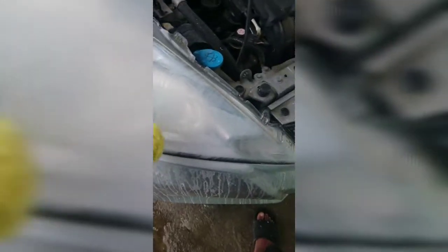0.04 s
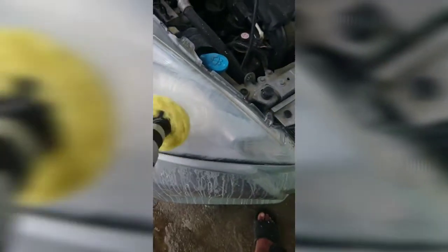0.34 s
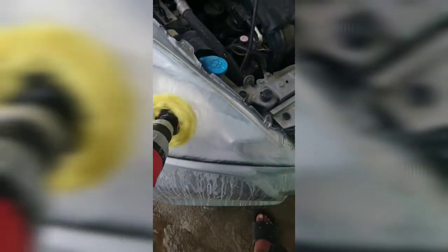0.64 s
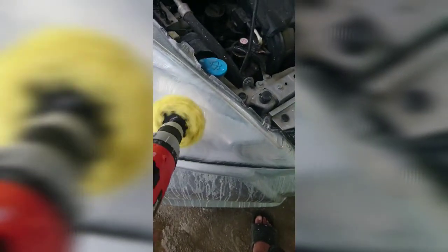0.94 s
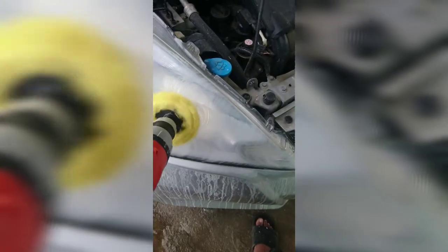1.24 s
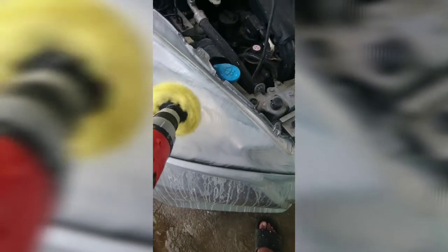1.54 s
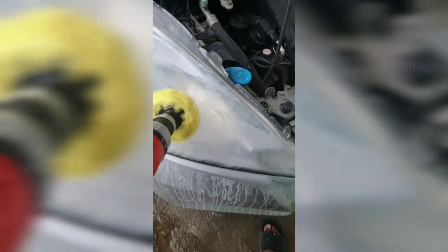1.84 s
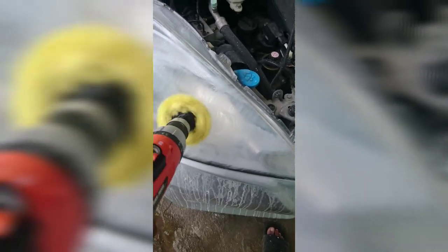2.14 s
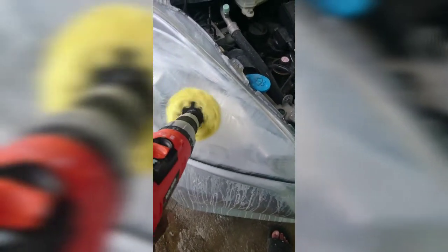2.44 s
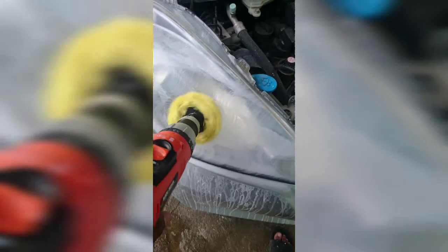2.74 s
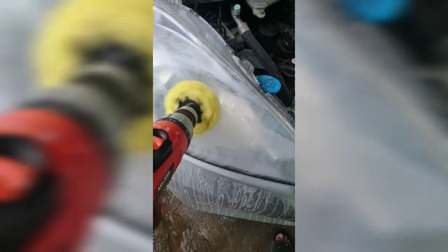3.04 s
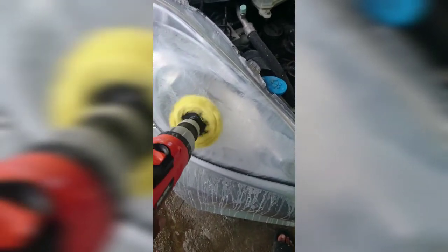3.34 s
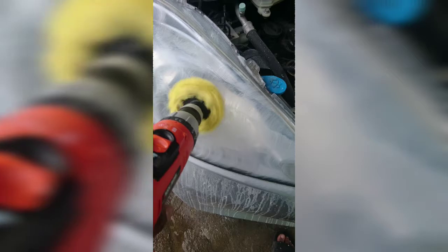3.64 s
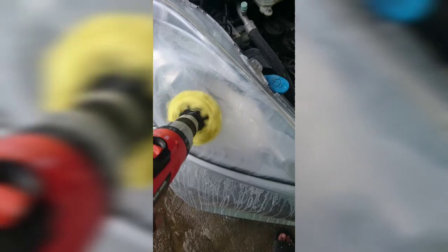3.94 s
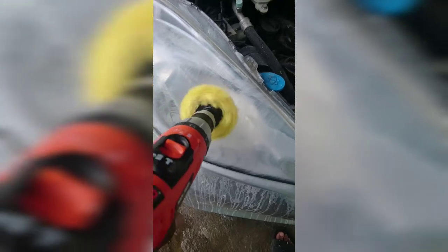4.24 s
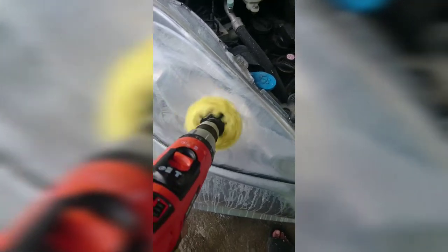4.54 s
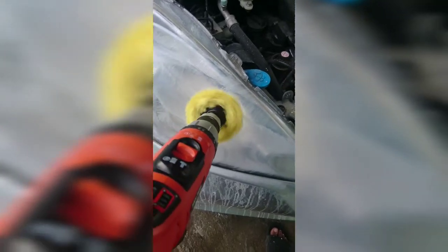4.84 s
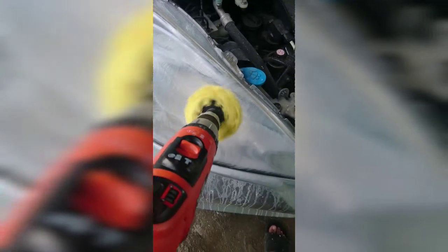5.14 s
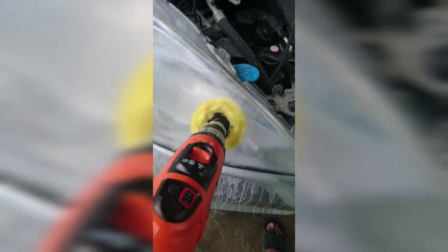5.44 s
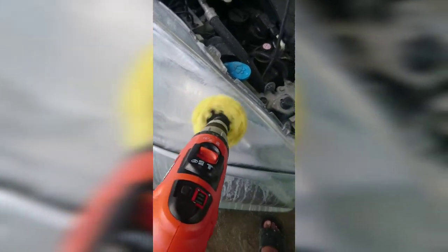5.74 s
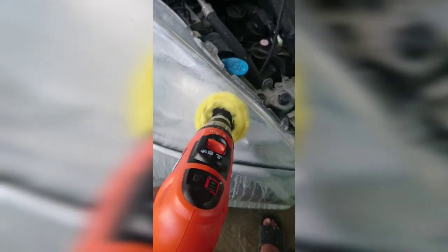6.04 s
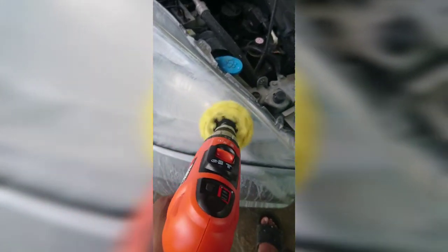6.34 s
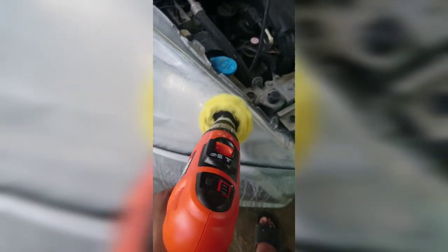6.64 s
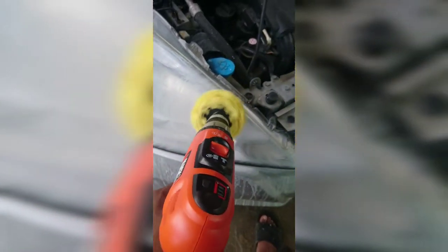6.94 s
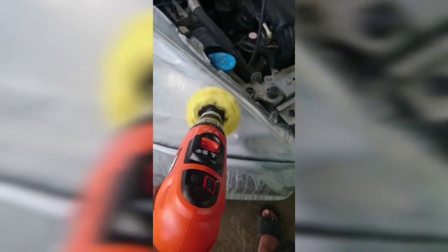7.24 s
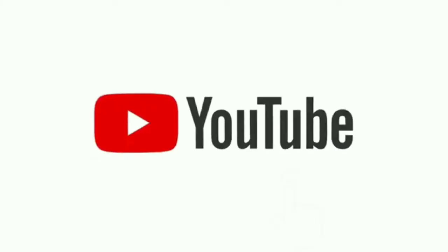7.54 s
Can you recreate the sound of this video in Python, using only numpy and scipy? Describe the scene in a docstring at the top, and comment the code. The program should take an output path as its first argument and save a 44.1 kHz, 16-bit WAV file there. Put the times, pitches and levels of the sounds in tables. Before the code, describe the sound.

Heard close up outdoors, a cordless drill starts with small clicks and a brief rasp, then polishes a plastic car headlamp with a wet foam pad. A piercing, even whine rides on fizzing motor hiss and the pad's continuous rubbing, growing louder and softer as the tool is pressed and steered. Near the end the pitch dips and the drill stops at once with a clack, over a barely audible low rumble.

```python
"""A cordless drill spins a foam pad on a plastic headlamp, close by.
The trigger clicks, the motor runs up, and the gear teeth whine, sagging and swelling as the pad is
pressed and steered. The motor adds many fainter tones, the wet pad rubs, and gears and brushes hiss.
The drill swings round until it points away from the listener; on release the brake stops it at once.
The car body and floor add a short echo, over faint outdoor air and a low rumble."""
import sys
import numpy as np
from scipy import signal
from scipy.fft import rfft, irfft, next_fast_len
from scipy.io import wavfile
from scipy.ndimage import uniform_filter1d, map_coordinates

SR = 44100
rng = np.random.default_rng(int(sys.argv[2]) if len(sys.argv) > 2 else 0)


def inscribe(sig):
    """Save sig as 16-bit PCM at rate SR to the path in sys.argv[1].

    A 1-D sig is mono; a 2-D sig holds one channel per row.
    Samples are clipped to [-1, 1] before scaling.
    """
    pcm = np.round(np.clip(np.atleast_2d(sig).T, -1, 1) * 32767)
    wavfile.write(sys.argv[1], SR, pcm.astype(np.int16))


N = 335160

START_S, EASE_S, BRAKE_S = 0.1, 7.31, 7.451  # trigger pulled, trigger let up, brake on
COAST_HZ_PER_S, BRAKE_HZ_PER_S = 235, 4830  # how fast the motor loses speed
TEETH, GEAR_RATIO, PLANETS = 15, 31, 3  # teeth on the motor's gear, motor turns per pad turn, gears
SIZZLE_MULTIPLES = (39, 40)  # two motor tones near 12 kHz
TOP_HZ = 15750

# Levels in the tables are relative. A "multiple" times the motor's turns per second gives a pitch.
# "Side", "slant" and "rear" are levels heard from there; t60 is the time taken to fade by 60 dB.
# Load on the gears, given as the strength of their whine: t/s, level/dB
GEAR_LOAD = [(0.5, -37), (0.59, -41), (1.43, -39.5), (1.73, -29.5), (2.03, -32.5), (2.47, -25.5),
             (3.3, -22.5), (3.4, -27), (3.7, -22), (4.42, -23), (4.7, -32.5), (5.18, -28), (5.5, -38),
             (5.61, -34), (5.67, -37), (5.86, -35), (5.97, -38.5), (6.24, -23.5), (6.75, -22.5), (7.3, -25)]
# The teeth briefly bite harder (+) or run slack (-): t/s, half length/s, level/dB
TOOTH_BITES = [(.175, .008, -14), (0.284, 0.027, 7.5), (.333, .008, -10), (.38, 0.031, 4.5), (.63, .03, -7),
               (.8, .1, -3), (1.22, .03, -12), (1.72, .1, 0.5), (2.12, 0.031, 3), (4.85, 0.038, 5.5),
               (5.502, 0.032, -4), (5.69, 0.026, -10), (5.963, 0.022, -6), (7.368, .022, -4.5),
               (7.437, .02, -4)]
# Motor turns per second at full trigger: t/s, f/Hz
CRUISE_SPEED = [(0.55, 305.0), (1.82, 303.1), (2.22, 303.5), (3.19, 301.9), (3.29, 299.4), (3.73, 302.3),
                (3.83, 297.4), (4.18, 300.3), (5.27, 296.0), (5.48, 297.0), (6.27, 294.8), (6.66, 296.0),
                (6.92, 294.1), (7.28, 294.1)]
# Which way the drill points: t/s, turn (0 heard from the side, 1 from behind)
DRILL_TURN = [(0, 0), (3.8, 0.034), (4.6, 0.27), (5.85, 0.71), (6.2, 0.98), (7.6, 0.89)]
# Plain motor tones: multiple, side/dB, slant/dB, rear/dB
MOTOR_TONES = [(4, -56, -51, -53), (5, -60, -63, -55), (6, -66, -50, -48), (10, -70, -56, -63),
               (12, -58.5, -63, -67), (17, -68, -59, -63), (19, -62, -46, -58), (20, -58, -56, -50),
               (21, -49, -54, -51), (22, -57, -61, -52), (23, -68, -55, -48), (24, -54, -61, -55),
               (30, -53.5, -50, -56.5), (31, -74, -56, -62), (32, -54.5, -57, -53), (33, -59, -50, -56),
               (34, -56, -51, -58), (35, -63, -55, -66), (36, -63, -68, -64), (37, -54.5, -57, -56),
               (38, -55, -55, -70), (39, -50.5, -47.5, -55), (41, -56, -44.5, -60), (42, -67, -44, -50),
               (43, -55, -51, -59), (44, -66, -62, -60), (45, -56, -59, -58), (46, -65, -66, -60.5),
               (47, -55, -62, -59), (48, -61, -62, -70), (49, -61, -66, -65), (50, -56, -58, -72),
               (51, -54, -59, -56), (52, -47, -55, -64)]
# Stronger motor tones, most following the load: multiple, side/dB, slant/dB, rear/dB, dB per dB of load
LOADED_TONES = [(1, -51, -56.5, -60, 0), (2, -51, -54.5, -55.5, -0.03), (9, -48, -42.5, -47, 0.1),
                (14, -42.5, -35, -39.5, 0.4), (16, -43.5, -36, -49, .5), (18, -48, -39.5, -49, 0.1),
                (40, -47.5, -43, -58, -0.1)]
# The two tones near 12 kHz swell, then dip: t/s, half length/s, level/dB
SIZZLE_SWELLS = [(2.55, .45, 4.5), (3.95, .4, -3.5)]
# Colour of the pad's rubbing and the housing: f/Hz, level/dB
RUB_COLOUR = [(120, -34.5), (225, -25), (272, -16), (340, -19.5), (620, -12), (740, -12.5), (900, -7.5),
              (1050, -7), (1230, -5.5), (1420, -10), (1600, -9), (1830, -5.5), (2050, -10.5), (2350, -17),
              (3500, -27)]
# Hiss of the gears and cooling air: f/Hz, side/dB, rear/dB
GEAR_HISS = [(1800, -30, -32), (2450, -4, -7), (2710, 0.5, 2), (3230, 9.5, 6.5), (3670, 2.5, -4.5),
             (4050, 10.5, 15.5), (4450, 5, 5), (5200, 2, 5.5), (5790, 4, 6), (7000, -2.5, 2),
             (7540, -2.5, -6), (7960, -15, -15), (9000, -42, -40)]
# Fizz of the brushes, the motor's sliding contacts: f/Hz, side/dB, rear/dB
BRUSH_FIZZ = [(7500, -40, -38), (8400, -21, -14), (8970, -5.5, -3), (10200, -4.5, -8), (10900, -9.5, -18),
              (11550, -4, -8), (12100, 1.5, -6), (13100, -4, -3), (14500, -5, -14), (15500, 2, -6),
              (16500, -6, -15)]
# Pitches at which the gearbox rings: f/Hz, width/Hz, level/dB
GEARBOX_RINGS = [(6190, 740, 2.5), (9900, 300, -9), (13200, 1000, -12), (15100, 700, -18)]
# The rasp flares while the speed changes: t/s, half length/s, level/dB
RASP_FLARES = [(.13, .02, -47), (.3, 0.089, -40.5), (7.39, .04, -44.5)]
# Clicks of the trigger and loose gears: t/s, steel ring/dB, crack/dB, housing knock/dB
CLICK_HITS = [(0.061, -54, -50, -73), (0.076, -43, -66, -75), (0.085, -29.5, -54, -57),
              (.109, -50.5, -39, -36), (.124, -41, -25, -44), (0.147, -30, -26, -42),
              (7.452, -42.5, -25, -38), (7.462, -42, -22, -39), (7.474, -48, -40, -34)]
# Ringing of small steel parts: f/Hz, level/dB, t60/s
STEEL_RINGS = [(4230, -22, .025), (4600, 1, 0.025), (4950, -5, 0.052), (6350, -21, 0.022)]
# Ringing of the drill's housing: f/Hz, level/dB, t60/s
HOUSING_RINGS = [(520, -12, .16), (667, -5, 0.14), (1130, -4, .09), (1282, 2, 0.083), (1840, -16, 0.041)]
# Length of the echo from car body and floor: f/Hz, t60/s
ECHO_DECAY = [(200, 0.53), (1200, 0.23), (4200, 0.36), (8000, 0.26), (15000, 0.079)]
# Colour of the outdoor air: f/Hz, level/dB
AIR_COLOUR = [(30, -12), (150, -3.5), (500, -6), (1200, -8), (2500, -15), (5000, -16), (9000, -25),
              (16000, -38)]
# Colour of the low rumble: f/Hz, level/dB
RUMBLE_COLOUR = [(20, -27), (35, -18), (52, 1), (85, 6), (130, -7), (250, -32), (600, -60)]
# Swells of that rumble: t/s, half length/s, level/dB
RUMBLE_SWELLS = [(.58, 0.19, -61), (3.33, .07, -60), (3.93, 0.065, -65), (4.62, 0.1, -67), (6.86, .06, -64),
                 (7.21, .08, -56)]


def gear_whine(angle, pace, speed, flutter_db=0.92, rough=0.036, trim_db=2.1, slack_hz_per_s=1500):
    """The teeth of the motor's gear sing one strong tone; hard braking parts them and they go silent."""
    level_db = curves(GEAR_LOAD)[0] + swells_db(TOOTH_BITES) + trim_db
    touching = uniform_filter1d(1.0 * (np.gradient(speed) * SR > -slack_hz_per_s), size=128)
    whine = tone(TEETH * angle) + rough * wobble(350) * tone(TEETH * angle)
    return touching * pace ** 2.4 * amp(level_db + flutter_db * wobble(18)) * whine


def motor_speed(run_up_s=0.058, run_up_shape=0.85):
    """Turns per second: the motor runs up, coasts as the trigger is let up, and is braked."""
    run_up = 1 - np.exp(-(since(START_S) / run_up_s) ** run_up_shape)
    lost = COAST_HZ_PER_S * since(EASE_S) + BRAKE_HZ_PER_S * since(BRAKE_S)
    return np.maximum(curves(CRUISE_SPEED)[0] * run_up - lost, 0)


def shaft_angle(speed, drag=0.00074, jitter=0.000495):
    """The motor's angle in turns; the off-centre pad drags once in each of its own turns."""
    pad_angle = np.cumsum(speed) / SR / GEAR_RATIO + 0.14 * wobble(3.01)
    return np.cumsum(speed * (1 + drag * tone(pad_angle) + jitter * wobble(40))) / SR


def motor_tones(angle, pace, turn, load_db, wander_db=1.5, flutter_db=1.97, drift_db=0.8, play=0.0043):
    """Tones at multiples of the motor's speed waver as the hand moves; some follow the load."""
    out = np.zeros(N)
    sizzle_db = dict.fromkeys(SIZZLE_MULTIPLES, swells_db(SIZZLE_SWELLS))
    for multiple, *views_db in MOTOR_TONES:
        level_db = level_at_turn(views_db, turn) + sizzle_db.get(multiple, 0) + 0.5
        waver_db = wander_db * wobble(3.07) + flutter_db * wobble(25)
        out += amp(level_db + waver_db) * tone(multiple * angle)
    for multiple, *views_db, follows in LOADED_TONES:
        level_db = level_at_turn(views_db, turn) + sizzle_db.get(multiple, 0) + follows * load_db
        waver_db = drift_db * wobble(3.97)
        shaken = angle + play * wobble(70)  # loose bearings blur the higher tones most
        roughness = 1 + 0.23 * min(multiple / TEETH, 1) * wobble(45)
        out += amp(level_db + waver_db) * roughness * tone(multiple * shaken)
    return out * pace ** 8  # fades steeply at low speed


def rotor_hum(angle, pace, speed, turn, hum_db=-50, growl_db=-27.5, housing_hz=575, width_octaves=0.54):
    """The rotor's three magnetic poles hum, and growl under the heavy current of start and stop."""
    pole_angle, pole_hz = 3 * angle, 3 * speed
    current = np.abs(uniform_filter1d(np.gradient(speed), size=400)) * SR / BRAKE_HZ_PER_S
    # The growl is boosted as its pitch sweeps past the housing's own note.
    boost = np.exp(-(np.log2((pole_hz + 1) / housing_hz) / width_octaves) ** 2)
    growl = amp(growl_db) * current ** 1.27 * boost
    hum = amp(hum_db - 8 * turn) * pace ** 2
    flutter = amp(1.7 * wobble(20))
    return (hum + growl) * flutter * (tone(pole_angle) + amp(-24) * tone(2 * pole_angle))


def pad_rub(angle, turn, rub_db=-37, ring_db=-41.3, ring_hz=1238, ring_width_hz=106, settle_s=0.23):
    """The wet pad settles on the lamp and rubs, throbbing as the planet gears pass; the shell rings."""
    settling_db = -5 * np.exp(-since(START_S) / settle_s)
    level = running(delay_s=0.0023, attack_s=0.01, overrun_s=0.021, t60=0.09)
    level *= amp(0.67 * turn + settling_db)
    throb = tone(PLANETS * angle / GEAR_RATIO + 0.15 * wobble(6))
    flutter_db = 0.62 * wobble(30) + 0.86 * wobble(160)
    rub = amp(rub_db + flutter_db) * (1 + 0.056 * throb) * unit(noise(RUB_COLOUR))
    shaking = rng.standard_normal(N) * amp(0.85 * wobble(35)) * (1 + 0.14 * throb)
    shell = filtered(shaking, lambda hz: 1 / (1 + 1j * (hz - ring_hz) / ring_width_hz) ** 2)
    return level * (rub + amp(ring_db + 2 * turn) * unit(shell))


def gear_and_brush_hiss(angle, pace, turn, load_db, gain_db=-34, pulsing=0.17):
    """Gears, cooling air and brushes hiss, pulsing once per motor turn."""
    level = running(delay_s=0.012, attack_s=0.014, overrun_s=0.02, t60=0.056)
    level *= amp(gain_db + 2.1 * turn - 7 * (1 - pace) + 0.04 * load_db)
    pulse = amp(0.69 * wobble(60)) * (1 + pulsing * tone(angle))
    return level * pulse * (turning_noise(GEAR_HISS, turn) + turning_noise(BRUSH_FIZZ, turn))


def gear_rasp(angle, start_db=-40, fade_db_per_s=3.3, pulsing=0.35, grain_db=2):
    """Chattering teeth make the gearbox ring at a few high pitches, less and less as they run in."""
    def gearbox(f):
        return sum(amp(db) / (1 + ((f - hz) / (width / 2)) ** 2) for hz, width, db in GEARBOX_RINGS)

    level = amp(start_db - fade_db_per_s * since(START_S)) + swells(RASP_FLARES)
    level *= running(delay_s=0.02, attack_s=0.013, overrun_s=0.0055, t60=0.04)
    chatter = rng.standard_normal(N) * (1 + pulsing * tone(angle)) * amp(grain_db * wobble(120))
    return level * unit(filtered(chatter, gearbox))


def gear_grind(angle, pace, turn, load_db, grind_db=-41.3, wobbles_per_s=750):
    """Loaded teeth meet unevenly and spread a band of noise round the pitch of the whine."""
    level_db = grind_db + 0.7 * load_db - 7 * turn + 0.5 * wobble(30)
    phase = 2 * np.pi * TEETH * angle
    band = wobble(wobbles_per_s) * np.sin(phase) + wobble(wobbles_per_s) * np.cos(phase)
    return pace ** 6 * amp(level_db) * unit(band)


def clicks(crack_t60=0.033, attack_s=0.0011, low_hz=450, high_hz=8000):
    """The trigger and the slack in the gears ring small steel parts and knock the housing."""
    out, t = np.zeros(N + SR), np.arange(SR // 5) / SR
    rise = 1 - np.exp(-t / attack_s)

    def ring(notes):
        return rise * sum(amp(db - 60 * t / t60) * tone(hz * t) for hz, db, t60 in notes)

    for s, ring_db, crack_db, knock_db in CLICK_HITS:
        crack = amp(crack_db - 60 * t / crack_t60) * rng.standard_normal(len(t))
        click = crack + amp(ring_db) * ring(STEEL_RINGS) + amp(knock_db) * ring(HOUSING_RINGS)
        out[round(s * SR):][:len(t)] += click
    return filtered(out[:N], lambda hz: hz ** 2 / (hz ** 2 + low_hz ** 2) / (1 + (hz / high_hz) ** 4))


def echo(x):
    """The car body and floor answer with a short tail of sound."""
    hz, t, spectrum = signal.stft(rng.standard_normal(SR // 2), SR, nperseg=256)
    fade = amp(-60 * t / along(ECHO_DECAY, hz)[:, None])
    tail = signal.istft(spectrum * fade, SR, nperseg=256)[1]
    return signal.fftconvolve(x, tail / np.linalg.norm(tail))[:N]


def background(air_db=-62, rumble_db=-71.5, uneven_db=3):
    """Faint outdoor air and an uneven low rumble."""
    rumble_level = amp(rumble_db + uneven_db * wobble(8.3)) + swells(RUMBLE_SWELLS)
    return amp(air_db) * unit(noise(AIR_COLOUR)) + rumble_level * unit(noise(RUMBLE_COLOUR))


def amp(db):
    """Turn decibels into a number to multiply by."""
    return np.exp(np.asarray(db) * (np.log(10) / 20))


def unit(x):
    """Scale a sound to an average strength (rms) of 1."""
    return x / np.sqrt(np.mean(x ** 2) + 1e-20)


def along(points, hz):
    """Read between (f/Hz, value) points, with octaves evenly spaced."""
    f, values = np.transpose(points)
    return np.interp(np.log(hz + 1), np.log(f + 1), values)


def curves(rows):
    """Join a table's points over time: one value per sample for each column after the first."""
    s, *columns = np.transpose(rows)
    return [np.interp(np.arange(N) / SR, s, column) for column in columns]


def wobble(rate):
    """A smooth curve through `rate` random values a second."""
    at = np.linspace(0, N, 8 * int(N * rate / SR + 1))
    values = rng.standard_normal(int(N * rate / SR) + 4)
    smooth = map_coordinates(values, [at * rate / SR], mode="nearest")
    return np.interp(np.arange(N), at, smooth)


def filtered(x, response):
    """Multiply each frequency in x by response(hz)."""
    size = next_fast_len(N + SR // 2)
    return irfft(rfft(x, size) * response(np.fft.rfftfreq(size, 1 / SR)), size)[:N]


def noise(colour):
    """Noise shaped by (f/Hz, level/dB) points."""
    return filtered(rng.standard_normal(N), lambda hz: amp(along(colour, hz)))


def turning_noise(colours, turn):
    """Noise that blends from its side colour to its rear colour as the drill turns."""
    hz, side, rear = np.transpose(colours)
    return np.sqrt(1 - turn) * noise(np.c_[hz, side]) + np.sqrt(turn) * noise(np.c_[hz, rear])


def level_at_turn(views_db, turn):
    """Blend the side, slant and rear levels as the drill turns."""
    return np.interp(turn, np.linspace(0, 1, len(views_db)), views_db)


def tone(angle):
    """A sine wave of rms 1 with a random start; the angle is in turns."""
    return np.sqrt(2) * np.sin(2 * np.pi * (angle + rng.random()))


def since(s):
    """Seconds gone by since a moment, 0 before it."""
    return np.maximum(np.arange(N) / SR - s, 0)


def bell(s, half_s):
    """A smooth rise to 1 and fall around a moment."""
    return np.exp(-np.minimum(((np.arange(N) / SR - s) / half_s) ** 2, 20))


def swells(rows):
    """Add up (t/s, half length/s, level/dB) swells as a number to multiply by."""
    return sum(amp(db) * bell(s, half_s) for s, half_s, db in rows)


def swells_db(rows):
    """Add up (t/s, half length/s, level/dB) rises and dips in decibels."""
    return sum(db * bell(s, half_s) for s, half_s, db in rows)


def running(delay_s, attack_s, overrun_s, t60):
    """Loudness of moving parts: up just after the trigger, held into the braking, then dying away."""
    rise = (1 + np.tanh((np.arange(N) / SR - START_S - delay_s) / attack_s)) / 2
    return rise * amp(-60 * since(BRAKE_S + overrun_s) / t60)


def scene(usual_load_db=-29):
    """Speed, load and the way the drill points shape its sound; echo and background are added."""
    speed = motor_speed()
    pace = speed / speed.max()  # 0 at rest, 1 at top speed
    load_db = curves(GEAR_LOAD)[0] - usual_load_db  # 0 at an ordinary pressure on the pad
    turn = np.clip(curves(DRILL_TURN)[0], 0, 1)
    angle = shaft_angle(speed)
    tones = gear_whine(angle, pace, speed) + motor_tones(angle, pace, turn, load_db)
    tones += rotor_hum(angle, pace, speed, turn)
    noises = pad_rub(angle, turn) + gear_and_brush_hiss(angle, pace, turn, load_db)
    noises += gear_rasp(angle) + gear_grind(angle, pace, turn, load_db) + clicks()
    echoes = echo(amp(-23.5) * tones + amp(-14.5) * noises)
    return (tones + noises + echoes + background())[None]


def record(dry):
    """Cut off all sound above TOP_HZ."""
    return filtered(dry[0], lambda hz: hz < TOP_HZ)[None]


dry = scene()
out = record(dry)
inscribe(out)
```